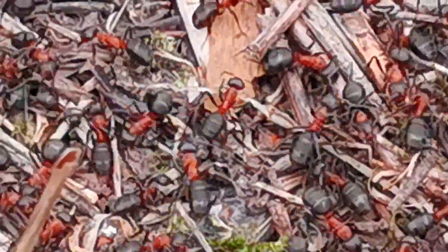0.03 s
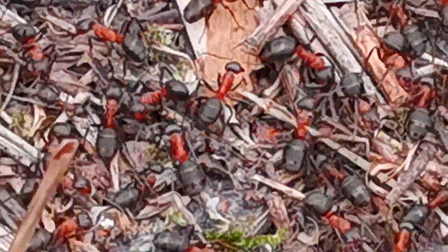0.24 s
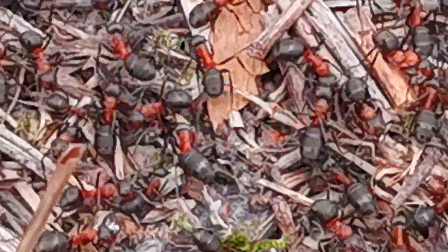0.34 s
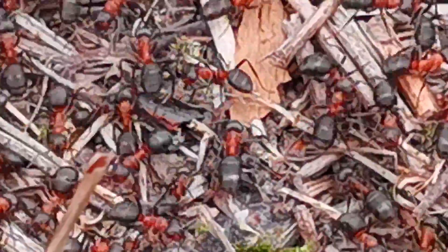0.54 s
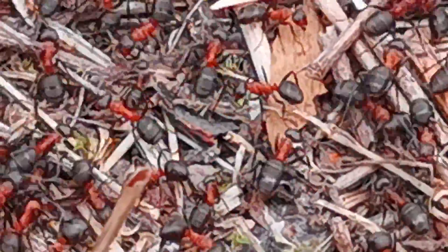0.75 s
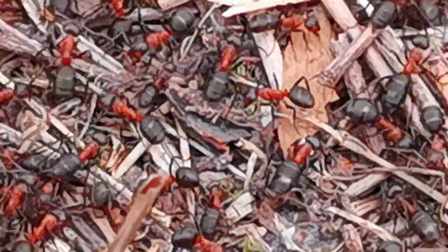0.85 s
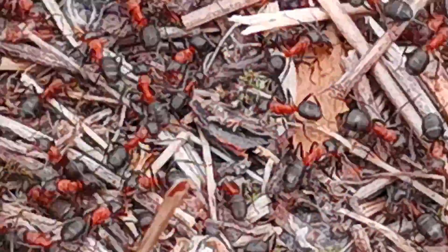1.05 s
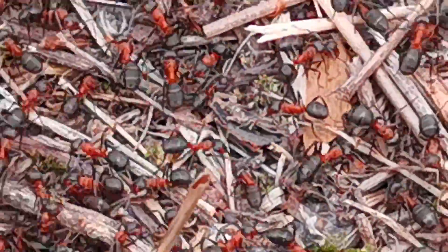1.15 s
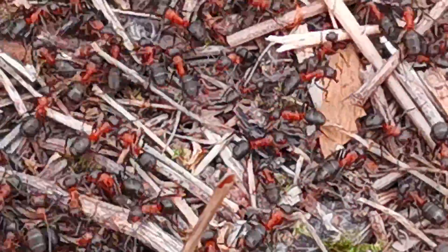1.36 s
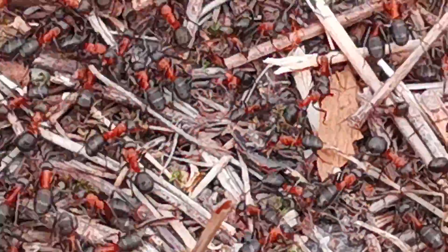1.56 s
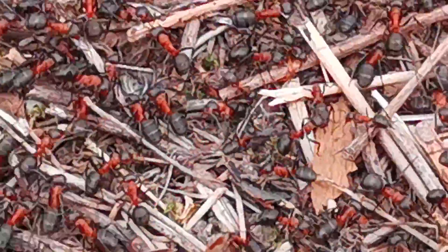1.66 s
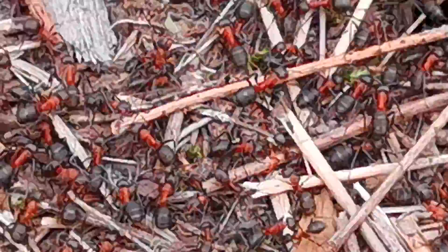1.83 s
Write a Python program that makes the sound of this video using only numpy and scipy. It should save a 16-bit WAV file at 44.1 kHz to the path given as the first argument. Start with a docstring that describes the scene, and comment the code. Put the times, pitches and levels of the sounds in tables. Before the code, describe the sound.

Ants rustle in dry litter on a forest anthill, a grainy hiss that is faint at first and swells around 1.2 and 1.7 seconds, joined by a faint low buzz. Light wind rumbles on the microphone throughout, with one strong buffet near 0.2 seconds. Small birds give gliding, echoing whistles until about 1.6 seconds. Dry litter ticks near 0.15 and 0.8 seconds, over a steady woodland hiss.

```python
"""Light wind rumbles, small birds whistle and a hissy rustle swells twice, close to a forest anthill.
The wind pushes on the microphone, with one strong buffet early on, over the steady hiss of the woods.
The whistles glide and echo among the trees; dry litter ticks and a twig scuffs softly.
The rustle is the sound of many tiny rubs. Its two swells come in the second half, together with
a faint low buzz. A few short hums come and go."""
import sys
import numpy as np
from scipy import signal
from scipy.fft import rfft, irfft
from scipy.io import wavfile
from scipy.ndimage import uniform_filter1d

SR = 44100
rng = np.random.default_rng(int(sys.argv[2]) if len(sys.argv) > 2 else 0)


def digitize_waveform(pressure):
    """Quantize a signal to 16-bit integers and store it at the path in sys.argv[1].

    Rows of a 2-D input are taken as channels; values are limited to [-1, 1].
    """
    field = np.atleast_2d(pressure).T
    bounded = np.clip(field, -1, 1)
    quanta = np.round(bounded * 32767).astype(np.int16)
    wavfile.write(sys.argv[1], SR, quanta)


N = 83790
T = np.arange(N) / SR
HZ = np.maximum(np.fft.rfftfreq(N, 1 / SR), 1)
RIGHT_LAG_S, LOW_SOUND_LAG_S = .00054, .00014  # right channel's delay: usual, and for wind and buzz


def from_db(db):
    """Turn decibels into a number to multiply by."""
    return 10 ** (np.asarray(db) / 20)


def rms_one(x):
    """Scale a signal to an average power of 1."""
    return x / np.sqrt(np.mean(x ** 2) + 1e-20)


def in_time(rows):
    """Join a table's points with straight lines: one curve for each column after the time."""
    times, *columns = np.transpose(rows)
    return [np.interp(T, times, column) for column in columns]


def colour(x, points, share=1):
    """Make some frequencies louder and others softer, following rows of f/Hz, gain/dB."""
    hz, db = np.transpose(points)
    gain_db = share * np.interp(np.log(HZ), np.log(hz), db)
    return irfft(rfft(x) * from_db(gain_db), N)


def pan(db):
    """Left and right gains; the left is louder by db."""
    return from_db([[db / 2], [-db / 2]])


def lean_left(x, lag_s=RIGHT_LAG_S):
    """The right channel is a little later than the left, so the sound leans left."""
    return np.array([x[0], np.interp(T - lag_s, T, x[1])])


def drift(rate_hz):
    """A smooth random wobble of about size 1, mostly slower than rate_hz."""
    return rms_one(irfft(rfft(rng.standard_normal(N)) / (1 + (HZ / rate_hz) ** 2), N))


def arch(start, length):
    """A rounded rise and fall, silent before and after."""
    return np.sin(np.pi * np.clip((T - start) / length, 0, 1))


def stereo_noise(alike):
    """White noise whose left and right sides are partly alike (0 = not at all)."""
    mid, side = rng.standard_normal((2, N))
    return rms_one(np.sqrt(1 + alike) * mid + np.sqrt(1 - alike) * side * [[1], [-1]])


def moving_resonance(x, centre_hz, width_hz, block=256):
    """Let through one band of frequencies whose centre follows a curve."""
    out, state = np.zeros((2, N)), np.zeros((2, 2))
    radius = np.exp(-np.pi * width_hz / SR)
    feed = (1 - radius ** 2) / 2 * np.array([1, 0, -1])
    for i in range(0, N, block):
        feedback = [1, -2 * radius * np.cos(2 * np.pi * centre_hz[i] / SR), radius ** 2]
        out[:, i:i + block], state = signal.lfilter(feed, feedback, x[:, i:i + block], zi=state)
    return out


def echoes(x, fade_s, delay_s=0):
    """A blur of echoes from twigs or trunks, different on each side, falling 60 dB in fade_s."""
    tail = rng.standard_normal((2, N)) * from_db(-60 * T / fade_s) * (T > delay_s)
    return signal.fftconvolve(x.mean(axis=0)[None], rms_one(tail) / np.sqrt(N), axes=1)[:, :N]


def air():
    """The smooth hiss of the surrounding woods."""
    # tone of the hiss: f/Hz, level/dB
    spectrum = [(300, 0.5), (650, 2), (900, -4.5), (1250, -4.5), (1800, -9), (2400, -3), (3000, -4.5),
                (4400, -4.5), (6000, -18.5), (7600, -24.5), (9700, -15.5), (12500, -9.5), (14500, -20),
                (16000, -37)]
    # its loudness: t/s, level/dB
    loudness = [(0, -61.5), (.15, -63), (.4, -62), (.6, -64), (.95, -64), (1.2, -63), (1.9, -61)]
    level_db, = in_time(loudness)
    hiss = rms_one(colour(lean_left(stereo_noise(alike=.2)), spectrum))
    return from_db(level_db + .5 * drift(34)) * hiss


def eddies(hz):
    """Swirling air: a rumble of even strength, boosted around one frequency."""
    # tone of the swirls: f/Hz, level/dB
    spectrum = [(20, 2.5), (30, -13), (45, 2), (65, 1), (100, -6), (140, -7), (250, -19.5), (400, -37.5),
                (800, -71)]
    boost = [(hz / 1.57, 0), (hz, 12), (hz * 1.57, 0)]  # f/Hz, gain/dB
    swirl = colour(colour(stereo_noise(alike=.98), spectrum), boost)
    local_power = uniform_filter1d(np.mean(swirl ** 2, axis=0), size=1500)
    return swirl / np.sqrt(local_power)


def wind():
    """Air rumbles on the microphone; buffets rise fast and die away, each with its own size of swirl."""
    # tone of the rumble: f/Hz, level/dB
    spectrum = [(20, 3.5), (45, 4), (90, 4.5), (160, -1), (260, -3.5), (360, -10), (500, -29), (1000, -54)]
    # its loudness: t/s, level/dB
    loudness = [(0, -58.5), (.4, -53.5), (.7, -57.5), (.92, -56.5), (1.15, -58.5), (1.45, -52.5),
                (1.7, -54), (1.9, -53.5)]
    # pushes of air: t/s, level/dB, decay/s, pan/dB, swirl f/Hz
    buffets = [(0.127, -52.5, 0.011, 10, 56), (0.222, -30.5, 0.019, 0, 30.5),
               (0.265, -36, 0.025, 1.5, 134.5), (0.375, -54.5, 0.041, 18.5, 78),
               (0.514, -52, 0.04, 16.5, 49), (0.822, -56, 0.018, 20.5, 42.4),
               (1.059, -54.5, 0.034, 8.5, 47.7), (1.166, -49, .05, 2, 40), (1.38, -49, 0.029, 2, 38.7),
               (1.579, -52, 0.048, -2, 84), (1.845, -55, 0.027, -3, 45)]
    level_db, = in_time(loudness)
    gain = from_db(level_db + .5 * drift(3.3))
    rumble = pan(1.5) * gain * rms_one(colour(stereo_noise(alike=.91), spectrum))
    rise_s = .028
    for time, db, decay_s, pan_db, hz in buffets:
        rise = np.clip((T - time) / rise_s + .5, 0, 1)
        fall = np.exp(-np.maximum(T - time - rise_s, 0) / decay_s)
        rumble += pan(pan_db) * from_db(db) * eddies(hz) * rise * fall
    return lean_left(rumble, LOW_SOUND_LAG_S)


def hums():
    """Short, wavering low hums swell and fade inside the rumble."""
    # one hum a row: start/s, length/s, level/dB, f/Hz
    notes = [(-.03, 0.12, -54.5, 158), (0.964, 0.097, -55, 155), (1.155, 0.16, -62.5, 342),
             (1.27, 0.13, -66.5, 415), (1.36, 0.1, -59.5, 398), (1.62, 0.12, -51, 149),
             (1.799, 0.081, -55.5, 193)]
    waver_hz = 8.83 * drift(29)
    return sum(from_db(db) * arch(start, length) * np.sin(2 * np.pi * np.cumsum(hz + waver_hz) / SR)
               for start, length, db, hz in notes)


def twig_scuff():
    """A twig rubs softly: a short, dull burst of noise."""
    # the rub: start/s, length/s, level/dB, pan/dB
    strokes = [(.146, .015, -54, 0)]
    # its tone: f/Hz, level/dB
    spectrum = [(150, -12), (300, 3), (600, 0), (1500, -5), (4500, -11), (7000, -28), (16000, -45)]
    gain = sum(pan(pan_db) * from_db(db) * arch(start, length) for start, length, db, pan_db in strokes)
    return lean_left(gain * rms_one(colour(stereo_noise(alike=.66), spectrum)))


def litter_ticks():
    """Dry litter snaps: each tick is one sharp pulse and a very short crackle."""
    # one snap a row: t/s, level/dB, pan/dB
    snaps = [(.1515, -40, -1), (.8212, -37, -4), (.8517, -52, 5)]
    decay_s, cutoff_hz = .0004, 5000
    out = np.zeros((2, N))
    for time, db, pan_db in snaps:
        snap = .15 * rng.standard_normal(N) * np.exp(-T / decay_s)
        snap[0] = 2  # the sharp pulse
        out += pan(pan_db) * from_db(db) * np.roll(snap, int(time * SR))
    return signal.lfilter(*signal.butter(4, cutoff_hz, fs=SR), out + 1e-18)


def birds():
    """Gliding, fluttering whistles echo off the thicket, one trunk and the wider forest."""
    # one whistle a row: start/s, length/s, four evenly spaced pitches f/Hz, level/dB, pan/dB, quaver/Hz
    whistles = [(-.008, .056, 3400, 3350, 3335, 3320, -54, -2.5, 8),
                (.032, .056, 3290, 3220, 3020, 2840, -54.5, -4, 12),
                (.135, .05, 3300, 3380, 3470, 3450, -64, 0, 12),
                (.178, .06, 3470, 3350, 3315, 3290, -57, .5, 10),
                (.232, .056, 3330, 3370, 3335, 3270, -55.5, 2, 10),
                (.325, .07, 2980, 2760, 2670, 2640, -68, -2, 12),
                (.386, .07, 2560, 2410, 2230, 1990, -65.5, 0, 12),
                (.506, .082, 5520, 5440, 5410, 5380, -58, 2.5, 18),
                (.608, .085, 4920, 4500, 4300, 4280, -55.5, -5.5, 45),
                (.628, .102, 4780, 4390, 4310, 4330, -54, -5.5, 30),
                (.831, .055, 2480, 2510, 2590, 2700, -61, -2, 13),
                (.862, .076, 2620, 2840, 2770, 2400, -56, -5, 15),
                (1.118, .058, 3050, 3180, 3250, 3280, -50.5, -3, 10),
                (1.158, .145, 3290, 3355, 3350, 3385, -55, 1, 13),
                (1.14, .1, 4250, 4250, 4190, 4200, -59, -12, 120),
                (1.09, .085, 10800, 11400, 11650, 11440, -72, 8, 60),
                (1.435, .066, 9850, 10100, 10450, 10800, -67, 12, 70),
                (1.541, .068, 10900, 11080, 10950, 10800, -76, 5, 60)]
    quaver_rate_hz, trunk_delay_s = 125, .056
    flutter = from_db(1.8 * drift(69))
    quaver = .7 * np.sin(2 * np.pi * quaver_rate_hz * T + drift(30)) + .8 * drift(81)
    direct = np.zeros((2, N))
    for start, length, *pitches, db, pan_db, depth_hz in whistles:
        progress = np.clip((T - start) / length, 0, 1)
        glide = np.polyfit(np.linspace(0, 1, 4), pitches, 3)  # a smooth curve through the pitches
        hz = np.polyval(glide, progress) + depth_hz * quaver
        swell = np.sin(np.pi * progress ** 1.15)
        direct += pan(pan_db) * from_db(db) * swell * flutter * np.sin(2 * np.pi * np.cumsum(hz) / SR)
    trunk = from_db(-12) * np.interp(T - trunk_delay_s, T, direct.mean(axis=0), left=0)
    thicket = from_db(-7.5) * echoes(direct, fade_s=.16)
    forest = from_db(-10) * echoes(direct, fade_s=.7, delay_s=.02)
    return lean_left(direct + trunk) + thicket + forest


def buzz():
    """A soft, unsteady low buzz with a strong third harmonic swells twice, rising in pitch each time."""
    # pitch and loudness of the buzz: t/s, f/Hz, level/dB
    motion = [(.93, 63, -70), (.98, 71.15, -58.5), (1.04, 82.2, -48.5), (1.1, 85.8, -48.5),
              (1.15, 86.46, -59.5), (1.2, 88.57, -61.5), (1.31, 82, -85), (1.45, 81.6, -68),
              (1.52, 85.54, -52), (1.615, 92.86, -54), (1.68, 94.24, -65.5), (1.8, 94.5, -64.5),
              (1.9, 91.7, -68)]
    # its harmonics (1, 2, 3... times the pitch): level/dB
    harmonics = [-3, -8, 1.5, -10, -15, -24, -21, -29, -23]
    jitter, roughness_db = .025, 3
    pitch_hz, level_db = in_time(motion)
    phase = 2 * np.pi * np.cumsum(pitch_hz * (1 + jitter * drift(44.2))) / SR
    tone = sum(from_db(db + roughness_db * drift(18)) * np.sin(k * phase + 2 * np.pi * rng.random())
               for k, db in enumerate(harmonics, 1))
    return lean_left(pan(5) * from_db(level_db) * rms_one(tone), LOW_SOUND_LAG_S)


def rustle_undertone():
    """The rustle's lower, narrow band: noise passed twice through the same resonance."""
    # loudness and centre of the band: t/s, level/dB, f/Hz
    motion = [(.93, -88, 2300), (1.03, -66.5, 2250), (1.15, -63.5, 2260), (1.3, -71, 2160),
              (1.43, -65.5, 2000), (1.52, -75.5, 2240), (1.7, -68.5, 2410), (1.9, -96, 2370)]
    level_db, centre_hz = in_time(motion)
    band = stereo_noise(alike=.2)
    for _ in range(2):
        band = moving_resonance(band, centre_hz, width_hz=230)
    return from_db(level_db) * rms_one(band)


def rustle():
    """Tiny rubs make a grainy hiss, with a bright band that climbs as the rustle goes on."""
    # tone of the rubbing: f/Hz, level/dB
    spectrum = [(300, 2), (650, -5.5), (850, -6.5), (1150, -2.5), (1650, -7.5), (2250, -5.5), (2750, -11),
                (3400, -4.5), (4500, -3.5), (5500, -6.5), (6500, -7), (8500, -15), (10000, -18),
                (11200, -11), (13000, -12.5), (14200, -39), (16000, -45)]
    # loudness of the hiss and centre of its bright band: t/s, level/dB, f/Hz
    motion = [(0, -66.5, 3930), (.12, -61, 3800), (.3, -67, 3680), (.92, -80, 3540), (1.06, -60.5, 3670),
              (1.17, -52.5, 3670), (1.32, -53, 4380), (1.48, -55, 4280), (1.58, -53.5, 4670),
              (1.68, -51, 5000), (1.76, -54.5, 4770), (1.83, -56.5, 4860), (1.9, -65.5, 4570)]
    grains_per_s = 2800
    level_db, centre_hz = in_time(motion)
    grains = (rng.random((2, N)) < grains_per_s / SR) * rng.standard_normal((2, N))
    friction = colour(stereo_noise(alike=.38) + .46 * rms_one(grains), spectrum)
    hiss = friction + 1.3 * moving_resonance(friction, centre_hz, width_hz=1350)
    undertone = rustle_undertone()
    return lean_left(from_db(level_db + .8 * drift(44)) * rms_one(hiss) + undertone)


def scene():
    """Everything heard at the anthill."""
    return wind() + air() + rustle() + buzz() + hums() + birds() + litter_ticks() + twig_scuff()


def record(dry):
    """Two microphones each favour different frequencies; the highest treble is cut."""
    # how much more the left one picks up than the right: f/Hz, gain/dB
    balance = [(35, 7), (130, 3), (250, -2.5), (400, -1.5), (700, -4), (1300, -4), (2300, -9.5), (4400, -9),
               (5600, -8), (7000, 1), (8300, 15), (10000, -1.5), (11500, -4), (13000, -6), (15000, -22)]
    cutoff_hz = 15700
    picked_up = colour(dry, balance, share=np.array([[.5], [-.5]]))
    return signal.sosfilt(signal.ellip(10, .1, 70, cutoff_hz, fs=SR, output="sos"), picked_up)


dry = scene()
out = record(dry)
digitize_waveform(out)
```